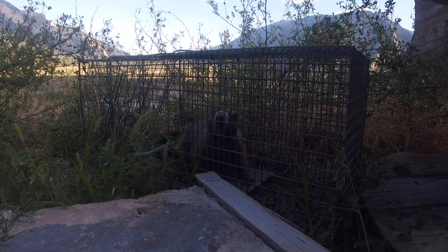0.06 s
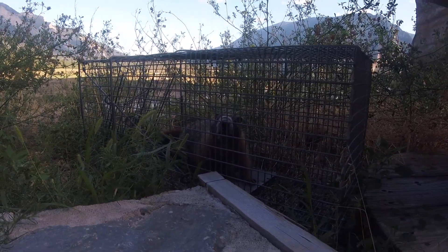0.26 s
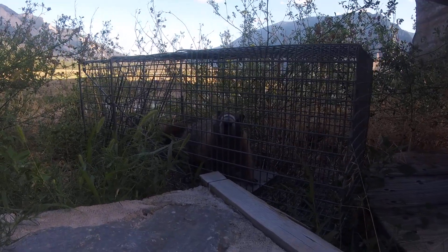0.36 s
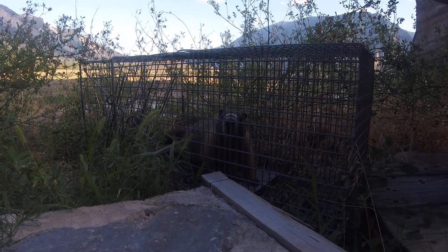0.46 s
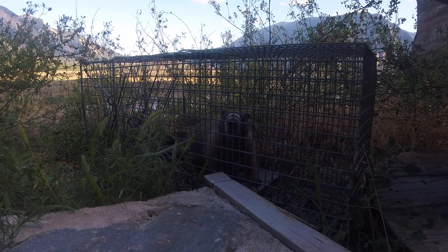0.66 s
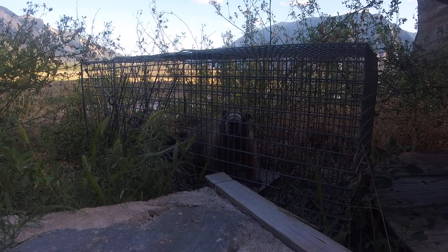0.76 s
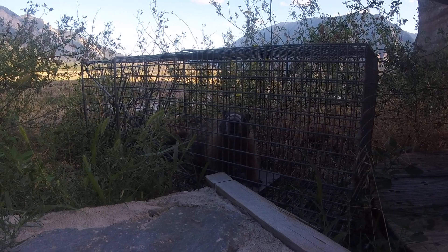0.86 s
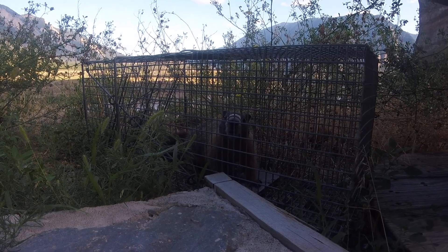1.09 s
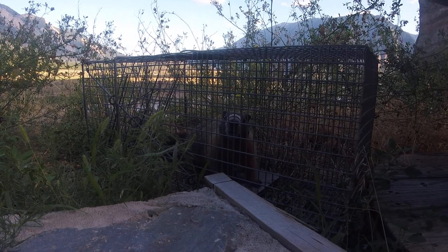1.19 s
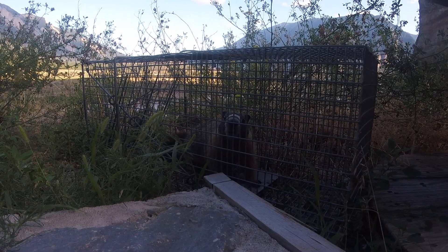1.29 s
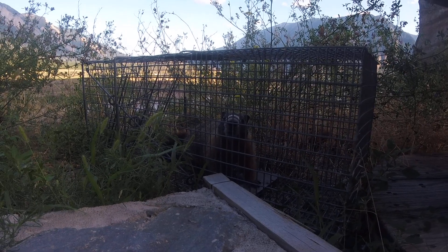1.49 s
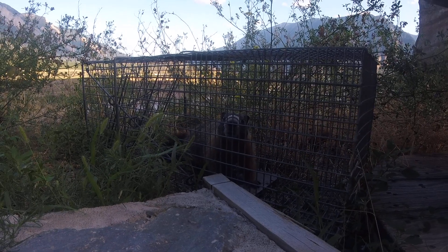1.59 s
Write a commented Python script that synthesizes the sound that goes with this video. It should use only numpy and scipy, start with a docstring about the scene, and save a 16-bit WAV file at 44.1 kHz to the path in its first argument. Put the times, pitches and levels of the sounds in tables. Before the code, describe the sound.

One sharp, raspy marmot chirp outdoors, with a brief echo and a faint dull knock.

```python
"""A marmot in a wire cage outdoors gives one hoarse alarm chirp: a faint puff, a sharp click, then a
rising whistle that breaks up into a rasp, the noise of air forced through throat and mouth resonances.
The call leaves a brief ringing, probably of the cage, and a diffuse echo from rocks and brush.
A small dull knock follows. Low outdoor rumble and a thin hiss run underneath, with a few soft thumps."""
import sys
import numpy as np
from scipy import signal
from scipy.fft import rfft, irfft
from scipy.io import wavfile
from scipy.ndimage import uniform_filter1d

SR = 44100
rng = np.random.default_rng(int(sys.argv[2]) if len(sys.argv) > 2 else 0)


def persist_wave(psi):
    """Save psi, clipped to +-1, as 16-bit WAV."""
    counts = np.round(np.clip(psi, -1, 1) * 32767).astype(np.int16)
    wavfile.write(sys.argv[1], SR, np.atleast_2d(counts).T)


N = 72765
TIME = np.arange(N) / SR


def from_db(db):
    """Amplitude ratio of a level in decibels."""
    return 10 ** (np.asarray(db) / 20)


def unit_rms(x):
    """Normalisation to rms 1."""
    return x / np.sqrt(np.mean(x ** 2) + 1e-20)


def noise(spectrum):
    """Spectral shaping: white noise weighted by rows of (f/Hz, relative level/dB), at rms 1."""
    hz, db = np.transpose(spectrum)
    bins = np.maximum(np.fft.rfftfreq(N, 1 / SR), 1)
    gain = from_db(np.interp(np.log(bins), np.log(hz), db))
    return unit_rms(irfft(rfft(rng.standard_normal(N)) * gain, N))


def butter(x, hz, kind, order=2):
    """Causal Butterworth filter."""
    return signal.sosfilt(signal.butter(order, hz, kind, fs=SR, output="sos"), x + 1e-18)


def drift(hz):
    """Random modulation: low-passed noise of rms 1."""
    return unit_rms(butter(rng.standard_normal(2 * N), hz, "low")[N:])


def steady(x, span_s=0.0031):
    """Division by the running rms holds the level constant, as in a steady airflow."""
    power = np.abs(uniform_filter1d(x ** 2, int(span_s * SR)))
    return x / np.sqrt(power + 1e-20)


def envelope(start, attack, hold, t60):
    """Power-law rise, plateau and exponential decay; times in seconds."""
    rise = np.clip((TIME - start) / attack, 0, 1) ** 0.55
    return rise * from_db(-60 * np.maximum(TIME - start - attack - hold, 0) / t60)


def resonant_noise(x, hz, width_hz):
    """A two-pole resonator selects one band of the noise x, which is then held at rms 1."""
    r = np.exp(-np.pi * width_hz / SR)
    feedback = [1, -2 * r * np.cos(2 * np.pi * hz / SR), r * r]
    return steady(signal.lfilter(np.array([1, 0, -1]) * (1 - r * r) / 2, feedback, x))


def stored_amplitude(x, t60):
    """Leaky integration: the rms of a store that gathers energy from x and loses 60 dB in t60 seconds."""
    retained = from_db(-120 / (t60 * SR))
    return np.sqrt(signal.lfilter([1 - retained], [1, -retained], x ** 2))


def background():
    """Broadband ambient noise: a distant rumble, slightly modulated, and a thin steady hiss."""
    # spectra of rumble and hiss: f/Hz, relative level/dB
    rumble = [(25, -22.5), (45, -25), (75, -30), (108, -45), (140, -2.5), (175, -0.5), (250, -8),
              (400, -11), (520, -14), (760, -17.5), (1200, -21.5), (2400, -31), (3300, -37), (4400, -49.5),
              (8000, -66)]
    hiss = [(3000, -36), (4500, -16), (5900, -9), (6600, -1), (8500, -2.5), (10300, -5.5), (11500, -10),
            (15300, -12)]
    return from_db(-49 + 0.44 * drift(hz=36)) * noise(rumble) + from_db(-65.5) * noise(hiss)


def puff():
    """Flow noise: a faint breath ahead of the call."""
    # breath spectrum: f/Hz, relative level/dB
    spectrum = [(500, -6), (900, 6), (2400, -8), (3050, -16), (3650, -0.5), (4350, -18), (5400, 2.5),
                (6500, -16), (8500, -20), (13000, -34)]
    flow = envelope(start=0.2072, attack=0.001, hold=0.009, t60=0.022)
    return from_db(-46.5) * flow * steady(noise(spectrum))


def thumps():
    """Damped free vibration: each soft push excites one low mode."""
    # pushes: onset t/s, level/dB before filtering, mode f/Hz
    pushes = [(0.22, -32.5, 180), (0.226, -31.5, 217), (0.248, -29, 224), (0.801, -27.5, 181),
              (1.092, -34.5, 144), (1.122, -34, 146), (1.353, -31, 193), (1.466, -35, 173),
              (1.586, -33, 170)]
    t60 = 0.037
    modes = np.zeros(N)
    for start, db, hz in pushes:
        age = np.maximum(TIME - start, 0)
        modes += from_db(db - 60 * age / t60) * np.sin(2 * np.pi * hz * age)
    softened = butter(modes, hz=365, kind="low")
    return butter(softened, hz=148, kind="high", order=8)


def rasp():
    """Source and filter: air forced through the throat gives broad noise and excites formants."""
    # airflow spectrum: f/Hz, relative level/dB
    spectrum = [(600, -37), (1000, -11.5), (1600, -14.5), (2100, 1.5), (3050, -0.5), (3600, 2),
                (4300, -4.5), (5400, 1.5), (7300, -8), (9400, -3), (10900, -11), (11600, -34), (15000, -26)]
    # throat and mouth formants: f/Hz, bandwidth/Hz, relative level/dB, fade/(dB/s; negative grows)
    formants = [(1040, 66, -8.5, -100), (2077, 81, -1, -4), (2640, 120, 3, 330), (3770, 150, 8, 130),
                (4874, 110, 9, 82), (5540, 300, -3, 250), (6950, 170, -19, 80), (8230, 260, -12, 110),
                (9000, 310, -8, 30)]
    attack, hold, t60 = 0.015, 0.024, 0.025
    start, grain_db, sag_db_per_s = 0.2285, 2, 60
    flow = envelope(start, attack, hold, t60) * from_db(grain_db * drift(hz=795))
    fade_time = np.clip(TIME - start - attack, 0, hold + t60)
    air = rng.standard_normal(N)
    bands = [from_db(db) * resonant_noise(air, hz, width) for hz, width, db, _ in formants]
    fades = [from_db(-rate * fade_time) for *_, rate in formants]
    throat = sum(band * fade for band, fade in zip(bands, fades)) / np.std(sum(bands))
    breath = from_db(-33 - sag_db_per_s * fade_time) * steady(noise(spectrum))
    return flow * (breath + from_db(-34.5) * throat)


def click():
    """A broadband transient as the call breaks loose."""
    # click spectrum: f/Hz, relative level/dB
    spectrum = [(400, -6.5), (1300, -4.5), (2600, 4), (3100, -2), (3700, 13.5), (4400, -5), (5400, 1),
                (7100, -14), (8100, -5), (8700, -16), (9600, -6), (11000, -10), (12000, -23), (15500, -14)]
    burst = envelope(start=0.2288, attack=0.00012, hold=0.00091, t60=0.0082)
    return from_db(-29.5) * burst * steady(noise(spectrum))


def whistle():
    """A rising harmonic tone, roughened by random frequency and amplitude modulation."""
    # glide of the fundamental: t/s, f/Hz
    glide = [(0.231, 2524), (0.238, 2620), (0.245, 2697), (0.252, 2770)]
    # level contour: t/s, level/dB
    contour = [(0.2305, -63), (0.2325, -38.5), (0.238, -29.5), (0.2402, -40.5), (0.2440, -27.5),
               (0.248, -27.5), (0.2508, -51), (0.256, -69)]
    jitter, shimmer_db, flutter_hz = 0.02, 2, 350
    hz = np.interp(TIME, *np.transpose(glide)) * (1 + jitter * drift(flutter_hz))
    phase = 2 * np.pi * np.cumsum(hz) / SR
    tone = np.sin(phase) + from_db(-26) * np.sin(2 * phase) + from_db(-16.5) * np.sin(3 * phase)
    db = np.interp(TIME, *np.transpose(contour), left=-np.inf, right=-np.inf)
    return np.sqrt(2) * tone * from_db(db + shimmer_db * drift(flutter_hz))


def scatter(call):
    """Diffuse scattering: rocks and brush return the call's energy as a decaying wash of noise."""
    # spectrum of the scattered sound: f/Hz, relative level/dB
    spectrum = [(400, -10), (1200, 8.5), (2600, 0.5), (3800, -4), (5400, -5.5), (7500, -8), (10500, -16),
                (12000, -33)]
    return from_db(-19) * stored_amplitude(call, t60=0.34) * noise(spectrum)


def cage(call):
    """Sympathetic resonance, probably of the cage: narrow noise bands ring on after the call."""
    # resonances: f/Hz, level/dB re the stored call, 60 dB decay t/s
    modes = [(1116, -25.5, 0.19), (2560, -25.5, 0.073), (3720, -25, 0.1), (5030, -17, 0.04),
             (5570, -22, 0.069)]
    ringing = np.zeros(N)
    for hz, db, t60 in modes:
        band = resonant_noise(rng.standard_normal(N), hz, width_hz=110)
        ringing += from_db(db) * stored_amplitude(call, t60) * band
    return ringing


def knock():
    """A band-limited impulse, heard as one dull, dead tap."""
    impulse = signal.unit_impulse(N, int(0.323 * SR))
    dulled = butter(impulse, hz=1305, kind="low", order=10)
    tap = butter(dulled, hz=325, kind="high")
    return from_db(-28) * tap / np.abs(tap).max()


def scene():
    """Superposition of the chirp, its echo and ringing, thumps, knock and background in one channel."""
    chirp = puff() + click() + whistle() + rasp()
    return (chirp + scatter(chirp) + thumps() + knock() + background() + cage(chirp))[None]


def record(dry):
    """Band limiting: an elliptic low-pass cuts the top treble steeply."""
    cutoff_hz = 15300
    return signal.sosfilt(signal.ellip(10, .1, 70, cutoff_hz, fs=SR, output="sos"), dry)


dry = scene()
out = record(dry)
persist_wave(out)
```